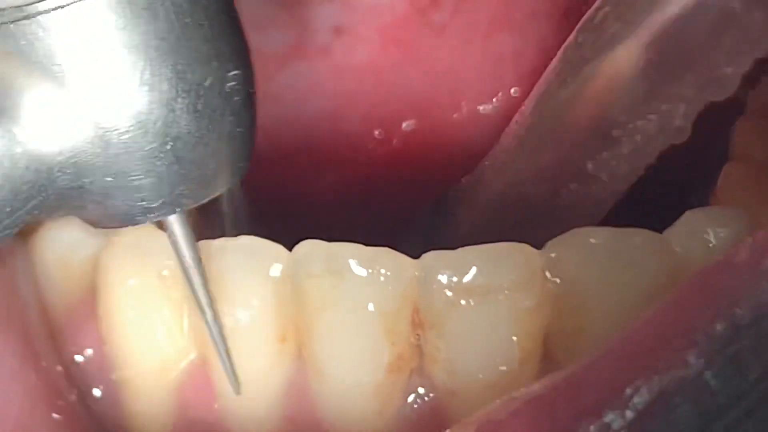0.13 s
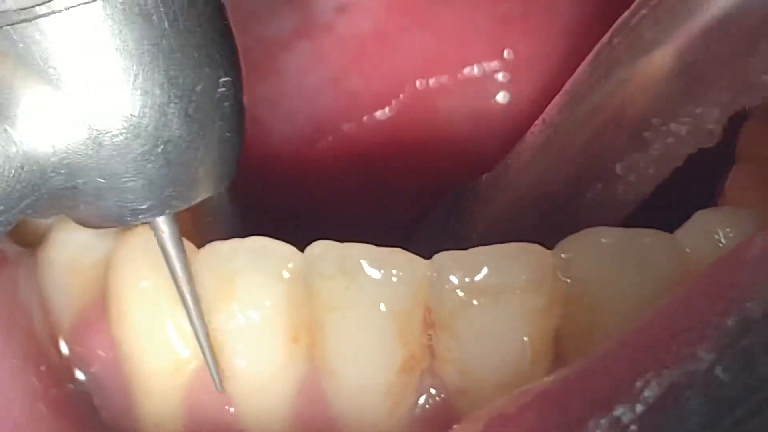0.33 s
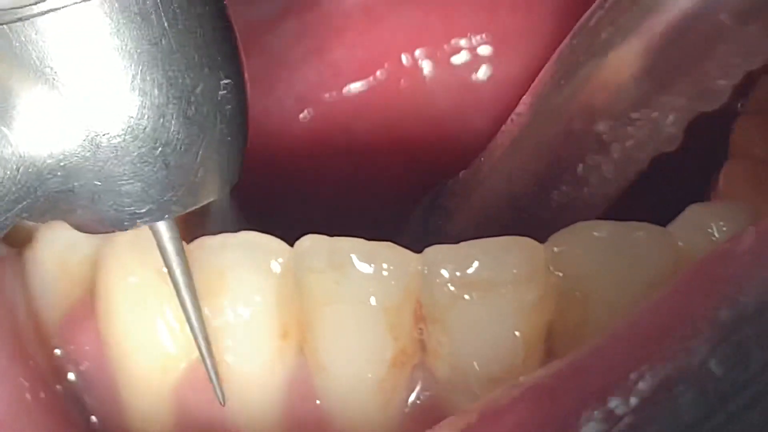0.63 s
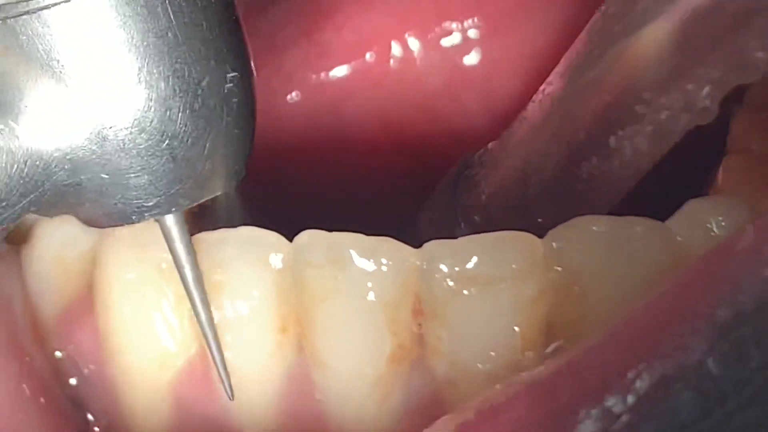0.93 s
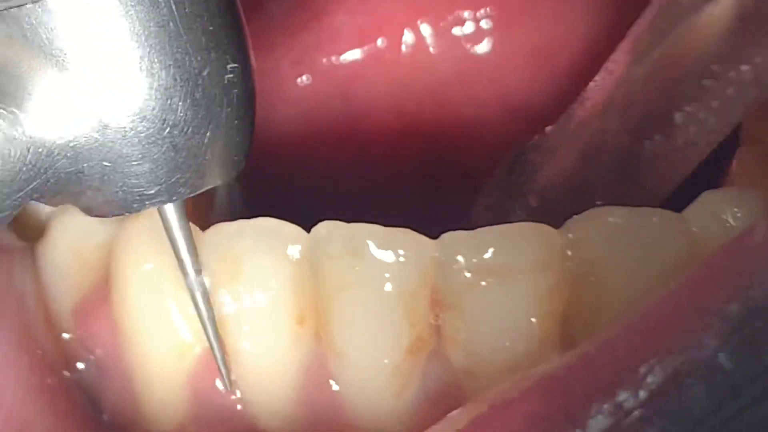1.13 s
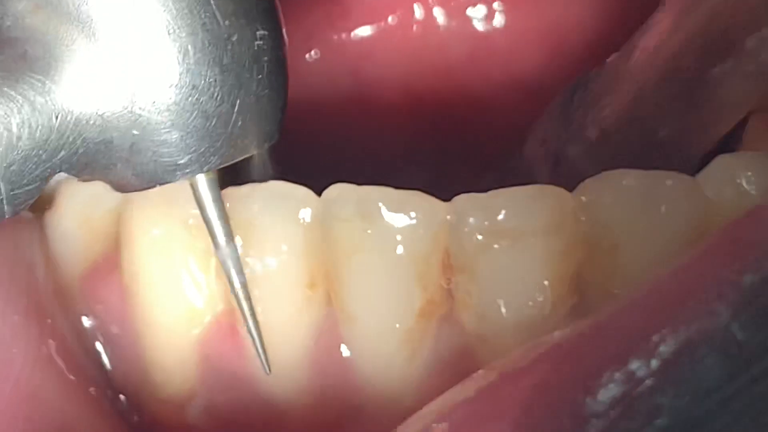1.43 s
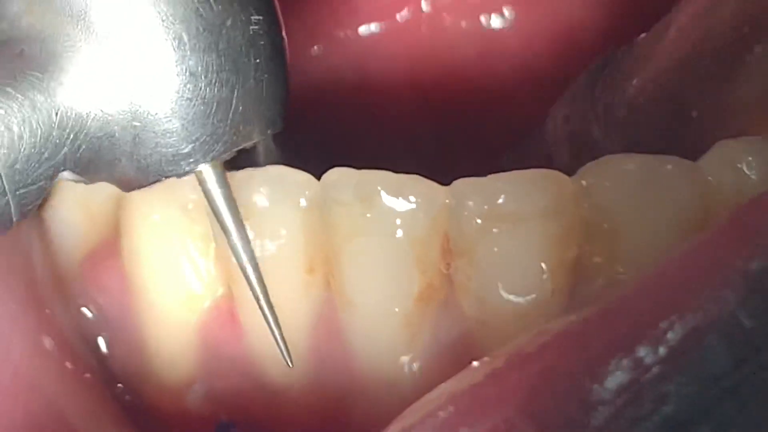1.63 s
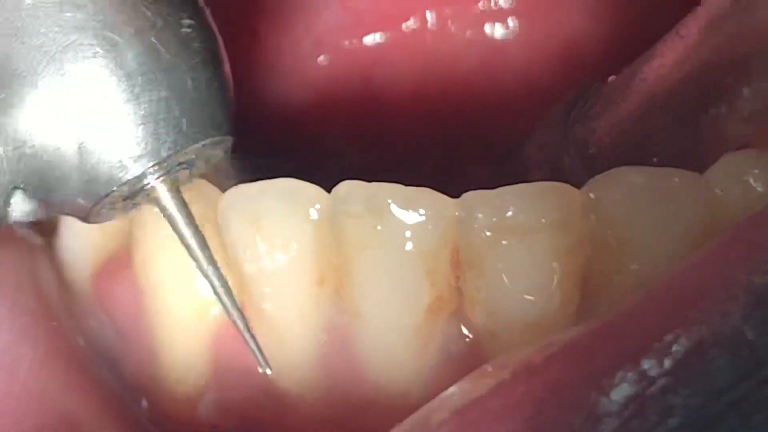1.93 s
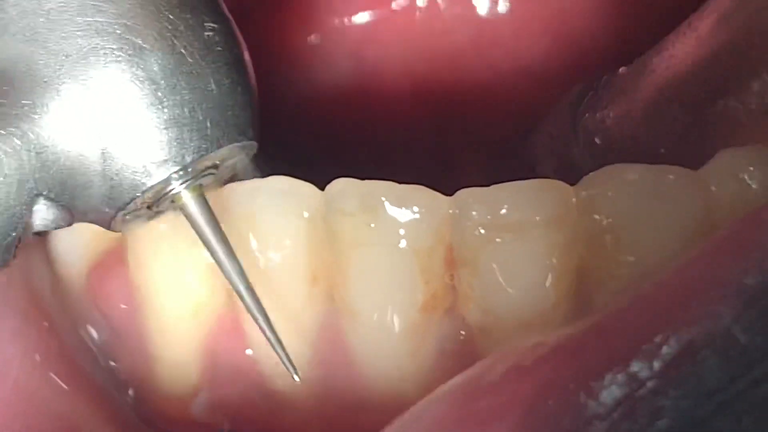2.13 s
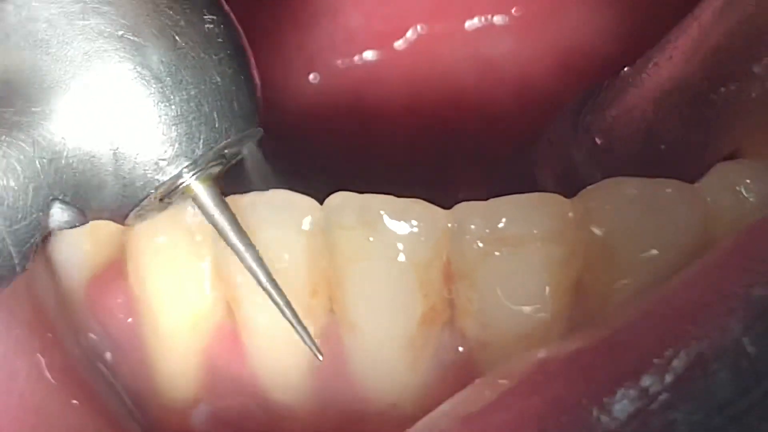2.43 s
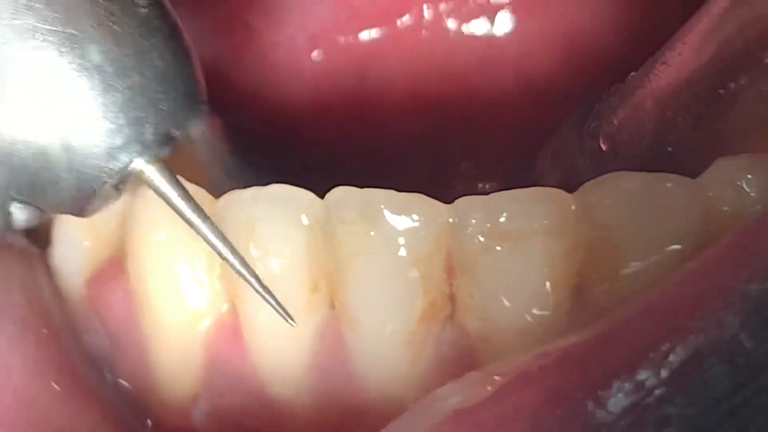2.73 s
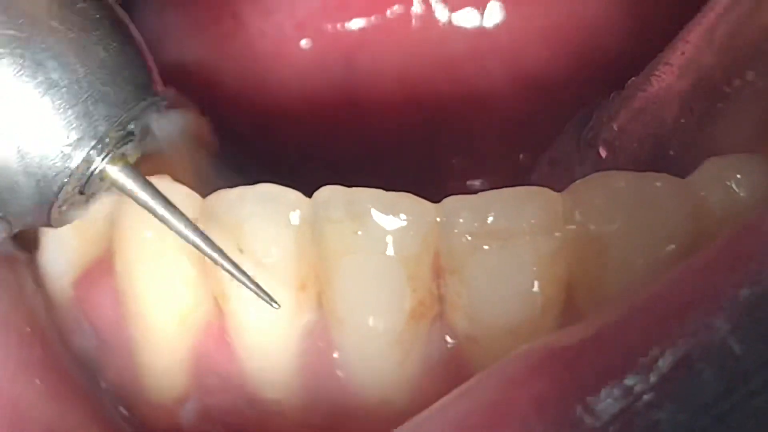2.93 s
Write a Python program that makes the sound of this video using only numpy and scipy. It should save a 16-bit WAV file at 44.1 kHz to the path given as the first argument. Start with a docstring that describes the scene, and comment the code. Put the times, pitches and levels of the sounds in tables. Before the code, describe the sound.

Close stereo pickup in a small treatment room: a dental drill rises quickly, sags slightly midway and steadies, with sharp spray hiss, low throbbing suction hum, faint whistle and wet gurgles that thin out later.

```python
"""Small clinic room: an air-turbine dental drill spins up and whines, sagging as the bur is pressed on a tooth.
Gliding sines make the whine; noise coloured by head tilt makes the hiss of its air and water spray.
A suction tube hums, whistles and slurps: noise bands, narrow fuzzy tones and short decaying rings.
A close stereo camera microphone with a limiter picks it up."""
import sys
import numpy as np
from scipy import signal
from scipy.fft import rfft, irfft
from scipy.io import wavfile
from scipy.ndimage import uniform_filter1d

SR = 44100
rng = np.random.default_rng(int(sys.argv[2]) if len(sys.argv) > 2 else 0)


def transcribe(u):
    """Save the signal u as a 16-bit wav file named by the first command-line argument.

    u: samples, shape (n,) or (channels, n), limited to [-1, 1]; the rate is SR.
    q: integer samples, one column per channel.
    """
    v = np.clip(np.atleast_2d(u).T, -1, 1)
    q = np.round(v * 32767).astype(np.int16)
    wavfile.write(sys.argv[1], SR, q)


N = 136269
TIME_S = np.arange(N) / SR
FREQ_HZ = np.fft.rfftfreq(N, 1 / SR)
SPRAY_FFT, SPRAY_OVERLAP = 512, 384  # samples

# rotor whine; spins up, sags under the bur's load, recovers: time_s, pitch_hz
ROTOR_PITCH = [(0, 4395), (.06, 4690), (.13, 4950), (.22, 5220), (.32, 5367), (.4, 5490), (.47, 5561),
               (.6, 5580), (.78, 5675), (.95, 5715), (1.06, 5681), (1.15, 5680), (1.26, 5494), (1.35, 5475),
               (1.44, 5601), (1.53, 5526), (1.63, 5616), (1.72, 5625), (1.8, 5675), (1.95, 5737),
               (2.2, 5771), (2.68, 5776), (2.71, 5750), (3.09, 5771)]
# whine level as the head turns in the mouth: time_s, left_db, right_db
WHINE_LEVEL = [(0, -33, -26), (.12, -36, -25.5), (.22, -37, -33), (.3, -28, -28), (.36, -24, -32),
               (.4, -21, -24), (.47, -25, -23), (.58, -25, -21), (.68, -21.5, -20), (.79, -20.5, -16.5),
               (.88, -25, -18), (1.08, -25.5, -16.5), (1.17, -24.5, -21), (1.26, -40, -30),
               (1.33, -35, -32), (1.44, -31, -25.5), (1.55, -40, -30), (1.63, -37, -29), (1.72, -42, -40),
               (1.8, -30, -27), (1.87, -32, -26.5), (1.95, -28, -22), (2.04, -29, -28), (2.15, -28, -26.5),
               (2.48, -33, -33), (2.58, -26, -25), (2.72, -36, -30), (2.92, -27, -23), (3.09, -28, -25)]
# left lead of the whine as the handpiece moves: time_s, lead_rad
WHINE_LEAD = [(0, -1), (.22, 2), (.37, -2.5), (.95, -3), (1.5, -2), (1.78, -2), (1.88, -5), (1.95, -4.5),
              (3.09, -5)]
# broad whistle of air leaving the head: time_s, centre_hz
JET_PITCH = [(0, 10800), (.5, 11200), (1.1, 11450), (1.8, 11700), (3.09, 11850)]
# spray hiss before the aim level: freq_hz, upright_db_per_hz, tilted_db_per_hz
SPRAY_COLOUR = [(700, -70, -70), (1600, -66, -68), (2000, -66, -66.5), (2550, -72, -70.5), (2830, -71, -71),
                (3180, -76, -72.6), (3370, -62.5, -60), (3540, -67.5, -65), (3900, -64, -69),
                (4190, -66, -64.5), (4500, -57, -62.5), (4700, -66, -64.5), (4900, -61, -61.5),
                (5250, -62.5, -63), (5550, -62.5, -66), (5900, -60, -59.5), (6240, -55, -55.5),
                (6550, -54, -55), (7000, -58, -54.5), (7350, -58.5, -55.5), (7700, -55.5, -55),
                (8350, -50.3, -56), (8900, -51, -57), (9450, -53.5, -55.5), (9900, -52, -57),
                (10300, -55, -57.5), (10900, -52.5, -56.5), (12400, -61.5, -59.5), (12900, -62.5, -60.5),
                (14000, -59.5, -54.6), (14900, -65.5, -59.5), (15400, -61.5, -58.3), (15750, -65, -60)]
# drill head aim: time_s, tilt_0_to_1, spray_level_db
HEAD_AIM = [(0, 0.5, -3.5), (.15, 0.1, -1), (.3, 0, 2), (.42, 0.2, -1), (.8, 0.4, -1.5), (1.05, 0.66, -2.5),
            (1.55, 1, -2.5), (1.8, 1, -2.5), (2.2, 1, -1.5), (2.5, 1, -1.5), (2.72, 1, 0), (2.9, 1, -2.5),
            (3.09, 1, -3.5)]
# spray spattering off the tooth: start_s, length_s, level_db
SPATTER_BURSTS = [(0.289, 0.0048, -11), (0.321, .007, -14)]
# microphone ports: freq_hz, likeness_0_to_1, left_lead_rad, left_minus_right_db
MIC_PORTS = [(30, 1, 0, 1.5), (206, 1, 1.05, 2), (406, 1, 0.36, -0.5), (750, 0.13, 0.97, 0.5),
             (940, 0.69, -1.5, -3), (1350, 0, -1.5, -10), (1435, 0.94, -4.5, -1.5), (2140, 0, -5.5, -1),
             (2500, 1, -3, -4.5), (3120, 0.07, -1, -4), (3275, 0.7, -6.5, -2), (4300, 0.93, -6, -3),
             (5100, 0.3, -6, 3.5), (6550, 0.8, -6, -0.5), (6800, 1, -7.5, -0.5), (8800, 0.56, -4.5, 0),
             (8940, 1, -4.5, 0), (10100, .99, -3.2, 0), (11300, .99, -3.1, 0), (12200, .9, -3, 0),
             (12650, 0.3, -5, 2), (13700, .9, -5.8, -1)]
# steady air drawn through the mouth, and the room: freq_hz, level_db_per_hz
DRAUGHT_COLOUR = [(15, -72), (45, -62), (70, -62), (115, -64.5), (145, -48), (170, -53.5), (230, -59),
                  (300, -62.5), (470, -71.5), (680, -61), (830, -63.5), (1020, -53.5), (1250, -56),
                  (1500, -73.5), (2500, -75)]
# narrow hose and pump tones: centre_hz, width_hz, left_db, right_db
HOSE_TONES = [(93, 5, -44, -44), (635, 10, -43, -52), (2245, 35, -62, -53), (2430, 11, -52, -54)]
# hose drone before throb and lean: time_s, level_db
DRONE_LEVEL = [(0, -28), (.45, -30), (.85, -33), (1.1, -26.5), (1.4, -26.5), (1.6, -31), (1.72, -28),
               (1.9, -33), (2.5, -32), (2.7, -29), (2.85, -27), (3.09, -31)]
# suction tip whistle, sinking as the tip clears: time_s, pitch_hz, level_db
TIP_TONE = [(0, 1030, -36), (.3, 1030, -29.5), (.6, 1040, -33), (1.2, 1060, -36), (2.0, 1070, -37.5),
            (2.6, 1075, -36), (2.87, 1080, -28.5), (2.93, 1020, -29.5), (3.0, 950, -29.5), (3.09, 920, -39)]
# mouth and tube resonances rung by a slurp, before pitch spread: pitch_hz, t60_s, level_db
MOUTH_RINGS = [(199, 0.03, -26.5), (620, 0.0063, -12.5), (1076, 0.016, 2.5), (1219, 0.017, -11)]
# ring paths, direct then off the cheek: left_delay_s, left_db, right_delay_s, right_db
RING_PATHS = [(0.00035, -10, 0.0015, 1), (0.00325, -10, 0.00465, -14)]
# loud slurps, strength before SLURP_GAIN_DB: time_s, strength_db
LOUD_SLURPS = [(0.115, -7.5), (0.129, -5), (0.151, -7), (0.157, -4.5), (0.168, -6), (0.249, -6),
               (0.256, -9), (0.271, -6), (0.288, -4), (0.322, 1.5), (0.333, -4), (0.346, -1.5), (0.353, -2),
               (0.393, -4.5), (0.402, -10), (0.423, -9), (0.535, -10.5), (0.545, -6.5), (0.656, -9.5),
               (0.819, -10.5), (0.867, -11.5), (1.036, -12), (1.2312, -4), (1.242, -6.5), (1.29, -4.5),
               (1.293, -4), (1.367, -10.5), (1.473, -14), (1.487, -7), (1.501, -16), (1.538, -4.5),
               (1.567, -1), (1.593, -9), (1.632, -15), (1.646, -7), (1.6725, -0.5), (1.82, -18),
               (1.852, -20), (1.865, -7), (2.135, -10.5), (2.382, -10.5), (2.737, -8.5), (2.76, -10.5),
               (2.786, -13), (2.822, -3), (2.838, -12), (2.896, -8.5)]
# small gurgles before random spread: time_s, level_db
GURGLE_LEVEL = [(0, -25), (.1, -32), (.16, -13.5), (.22, -17), (.29, -10), (.4, -15.5), (.48, -17.5),
                (.56, -17), (.7, -33), (.84, -19), (.95, -34), (1.18, -25), (1.26, -22), (1.42, -39),
                (1.52, -41), (1.75, -38), (2.15, -37), (2.6, -36), (2.84, -22), (3.09, -37)]

WOBBLE_HZ, FLUTTER_DB = 3, 0.9
SECOND_DB, THIRD_START_DB, THIRD_FADE_DB_PER_S = -38, -35, 55
JET_DB, JET_WIDTH_HZ = -28.5, 650
PATCH_DB, FLICKER_DB = 1.88, 0.3
DRAUGHT_FLUTTER_DB = 2.3
DRONE_HZ, DRONE_WOBBLE_HZ, DRONE_WIDTH_HZ = 199, 5, 32
DRONE_STEADY_POWER_SHARE, DRONE_LEAN_DB = 0.55, 2.1  # lean: up on the left, down on the right
THROB_PERIOD_S, THROB_PEAK_S, THROB_DB = 0.137, 1.337, 2
TIP_WIDTH_HZ, TIP_UPPER_RATIO, TIP_UPPER_DB = 38, 1.9, -17
SLURP_GAIN_DB, SLURP_RISE_S, SLURP_PITCH_SPREAD = 3, 0.00172, 0.022  # spread as a fraction
POP_DB, POP_S = -14, 0.00068
GURGLES_PER_S, GURGLE_SPREAD_DB = 240, 4
ROOM_DB, ROOM_T60_S = -18.5, 0.21
LIMIT, RECOVER_DB_PER_S = 0.86, 448
EDGE_HZ = 15790


def amp(db):
    """Amplitude ratio of a level in dB."""
    return 10 ** (np.asarray(db) / 20)


def evened(x):
    """Scale to an RMS of 1."""
    return x / np.sqrt(np.mean(x ** 2) + 1e-20)


def curve(table, at=TIME_S):
    """Interpolate every column linearly over the first."""
    first, *columns = np.transpose(table)
    return [np.interp(at, first, column) for column in columns]


def add(mix, start_s, sound):
    """Add a stereo sound in place, cut at the end of the mix."""
    part = mix[:, max(round(start_s * SR), 0):][:, :sound.shape[1]]
    part += sound[:, :part.shape[1]]


def drift(rate_hz):
    """Low-passed noise of RMS 1."""
    spectrum = rfft(rng.standard_normal(N)) / (1 + (FREQ_HZ / rate_hz) ** 4)
    return evened(irfft(spectrum, N))


def fuzzy_tone(pitch_hz, width_hz):
    """Air noise in a narrow resonance that can move: two drifts on a carrier in quadrature."""
    phase = 2 * np.pi * np.cumsum(pitch_hz * np.ones(N)) / SR
    return evened(drift(width_hz / 2) * np.cos(phase) + drift(width_hz / 2) * np.sin(phase))


def turbine():
    """The rotor's whine, its faint overtones and the whistle of its exhaust air."""
    left_db, right_db = curve(WHINE_LEVEL)
    pitch_hz = curve(ROTOR_PITCH)[0] + WOBBLE_HZ * drift(39)
    phase = 2 * np.pi * np.cumsum(pitch_hz) / SR
    lead_rad = curve(WHINE_LEAD)[0]
    left = amp(left_db + FLUTTER_DB * drift(34)) * np.sin(phase + lead_rad)
    right = amp(right_db + FLUTTER_DB * drift(27)) * np.sin(phase)
    second = amp(SECOND_DB) * np.sin(2 * phase)
    jet = amp(JET_DB) * fuzzy_tone(curve(JET_PITCH)[0], JET_WIDTH_HZ) / np.sqrt(2)
    third = amp(THIRD_START_DB - THIRD_FADE_DB_PER_S * TIME_S) * np.sin(3 * phase)
    high = second + jet  # opposite polarity in the two channels
    return np.sqrt(2) * (np.array([left + high, right - high]) + third)


def port_noise():
    """White noise of nominal 0 dB per Hz, given the two ports' likeness, phase and balance."""
    likeness, lead_rad, balance_db = curve(MIC_PORTS, FREQ_HZ)
    shared, separate = rfft(rng.standard_normal((2, N)))
    left = shared * np.exp(1j * lead_rad) * amp(balance_db / 2)
    right = (likeness * shared + np.sqrt(1 - likeness ** 2) * separate) * amp(-balance_db / 2)
    return irfft(np.array([left, right]), N) * np.sqrt(SR / 2)


def spray():
    """Air and water mist: a patchy hiss whose colour follows head tilt, with spatter bursts."""
    _, frame_s, bins = signal.stft(port_noise(), SR, nperseg=SPRAY_FFT, noverlap=SPRAY_OVERLAP)
    tilt, level_db = curve(HEAD_AIM, frame_s)
    upright_db, tilted_db = curve(SPRAY_COLOUR, np.fft.rfftfreq(SPRAY_FFT, 1 / SR)[:, None])
    patches = uniform_filter1d(rng.standard_normal(bins.shape[1:]), size=7, axis=0)  # over frequency
    patches = evened(uniform_filter1d(patches, size=12, axis=1))  # over time
    colour_db = upright_db + tilt * (tilted_db - upright_db)
    bins = bins * amp(colour_db + level_db + PATCH_DB * patches)
    hiss = signal.istft(bins, nperseg=SPRAY_FFT, noverlap=SPRAY_OVERLAP)[1][:, :N]
    bursts = np.zeros(N)
    for start_s, length_s, burst_db in SPATTER_BURSTS:
        half_s = length_s / 2
        bursts += amp(burst_db) * np.exp(-((TIME_S - start_s - half_s) / half_s) ** 2)
    return hiss * amp(FLICKER_DB * drift(70)) + bursts * evened(hiss)


def suction():
    """The steady draught through the mouth, the hose's throbbing drone and the pump's tones."""
    draught = irfft(rfft(port_noise()) * amp(curve(DRAUGHT_COLOUR, FREQ_HZ)[0]), N)
    draught = draught * amp(DRAUGHT_FLUTTER_DB * drift(28))
    tones = np.zeros((2, N))
    for centre_hz, width_hz, left_db, right_db in HOSE_TONES:
        tones += amp([[left_db], [right_db]]) * fuzzy_tone(centre_hz, width_hz)
    drone_hz = DRONE_HZ + DRONE_WOBBLE_HZ * drift(8.54)
    steady = np.sqrt(2 * DRONE_STEADY_POWER_SHARE) * np.sin(2 * np.pi * np.cumsum(drone_hz) / SR)
    fuzzy = np.sqrt(1 - DRONE_STEADY_POWER_SHARE) * fuzzy_tone(DRONE_HZ, DRONE_WIDTH_HZ)
    throb_db = THROB_DB * np.cos(2 * np.pi * (TIME_S - THROB_PEAK_S) / THROB_PERIOD_S)
    lean_db = DRONE_LEAN_DB * np.array([[1], [-1]])
    drone = (steady + fuzzy) * amp(curve(DRONE_LEVEL)[0] + throb_db + lean_db)
    return draught + tones + drone


def tip_whistle():
    """Air sings across the mouth of the suction tip, with a fainter upper resonance."""
    pitch_hz, level_db = curve(TIP_TONE)
    main = fuzzy_tone(pitch_hz, TIP_WIDTH_HZ)
    upper = amp(TIP_UPPER_DB) * fuzzy_tone(pitch_hz * TIP_UPPER_RATIO, 2 * TIP_WIDTH_HZ)
    return amp(level_db) * (main + upper)


def slurp(size):
    """A plug of water breaks in the tube: a soft pop, then the mouth rings briefly and echoes."""
    t_s = np.arange(SR // 20) / SR
    pop = amp(POP_DB) * (1 - t_s / POP_S) * np.exp(-t_s / POP_S)
    rings = np.zeros((2, len(t_s)))
    for left_s, left_db, right_s, right_db in RING_PATHS:
        since_s = np.maximum(t_s - np.array([[left_s], [right_s]]), 0)
        rise = 1 - np.exp(-(since_s / SLURP_RISE_S) ** 2)
        ring = 0
        for mode_hz, t60_s, level_db in MOUTH_RINGS:
            pitch_hz = mode_hz * (1 + SLURP_PITCH_SPREAD * size)
            decay = amp(level_db - 60 * (since_s - SLURP_RISE_S) / t60_s)
            ring = ring + decay * np.sin(2 * np.pi * pitch_hz * since_s)
        rings += amp([[left_db], [right_db]]) * rise * ring
    return rings + pop


def gurgling():
    """Water breaking up in the tube: loud slurps over a random stream of small ones."""
    water = np.zeros((2, N))
    loud_sizes = rng.standard_normal(len(LOUD_SLURPS))
    for (time_s, strength_db), size in zip(LOUD_SLURPS, loud_sizes):
        add(water, time_s - SLURP_RISE_S / 2, amp(strength_db + SLURP_GAIN_DB) * slurp(size))
    chance = rng.random(N)
    strength, sizes = rng.standard_normal((2, N))
    level_db = curve(GURGLE_LEVEL)[0] + GURGLE_SPREAD_DB * np.clip(strength, -2, 2)
    for i in np.flatnonzero(chance < GURGLES_PER_S / SR):
        add(water, i / SR, amp(level_db[i]) * slurp(sizes[i]))
    return water


def room(sound):
    """The short tail of a small room: decaying noise, convolved per channel."""
    t_s = np.arange(SR // 3) / SR
    tail = rng.standard_normal((2, len(t_s))) * amp(-60 * t_s / ROOM_T60_S) * (t_s > .005)
    return signal.fftconvolve(sound, tail / np.linalg.norm(tail[0]), axes=1)[:, :N]


def scene():
    """Sum drill, spray, suction and water; only the water feeds the room tail."""
    water = gurgling()
    return turbine() + spray() + suction() + tip_whistle() + water + amp(ROOM_DB) * room(water)


def record(dry):
    """A quick stereo-linked limiter ducks everything under loud peaks; then a low-pass."""
    over_db = 20 * np.log10(np.maximum(abs(dry).max(0) / LIMIT, 1))
    fall_db = TIME_S * RECOVER_DB_PER_S
    duck_db = np.maximum.accumulate(over_db + fall_db) - fall_db  # peak hold, linear recovery in dB
    held = dry * amp(-uniform_filter1d(duck_db, size=30))
    low_pass = signal.firwin(2047, EDGE_HZ, window=("kaiser", 9), fs=SR)
    return signal.oaconvolve(held, low_pass[None], "same")


dry = scene()
out = record(dry)
transcribe(out)
```